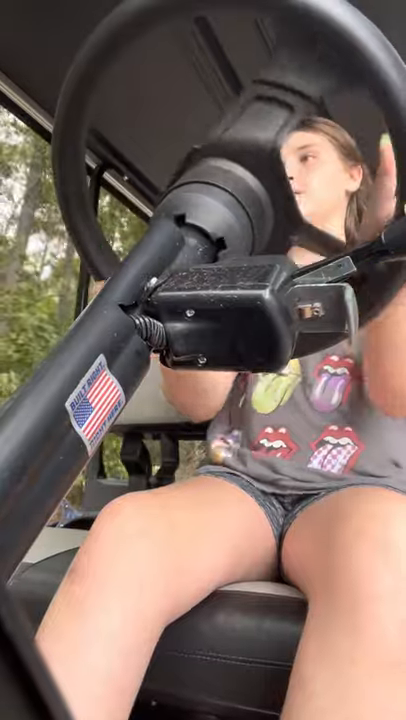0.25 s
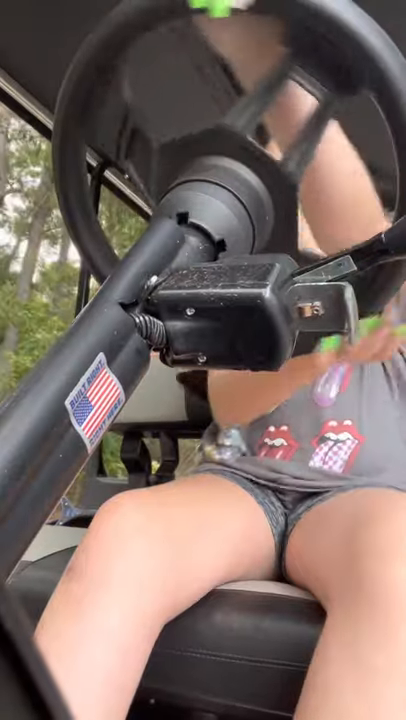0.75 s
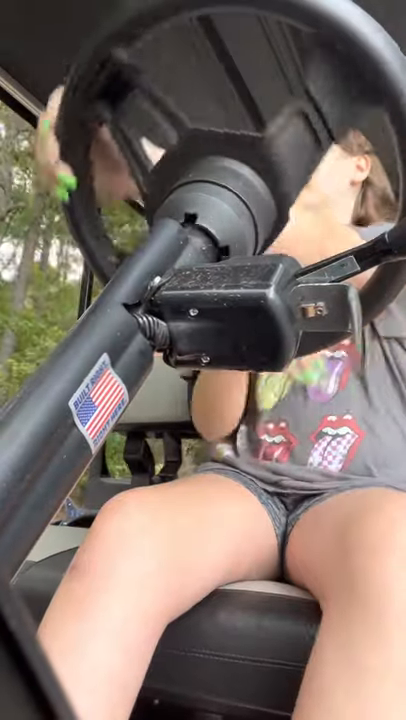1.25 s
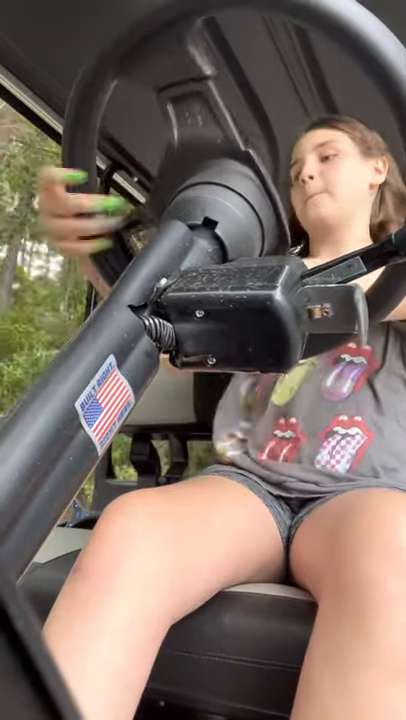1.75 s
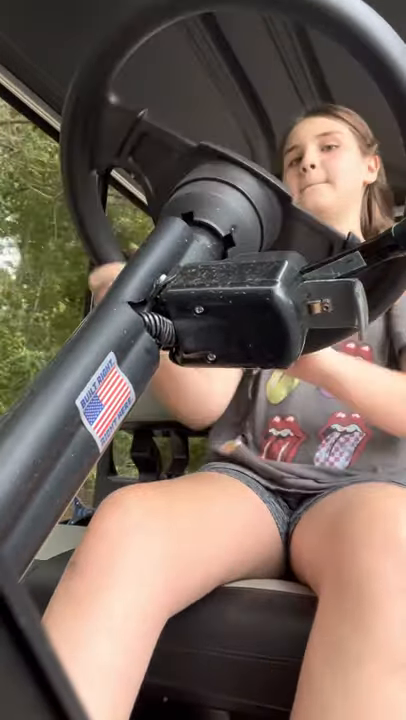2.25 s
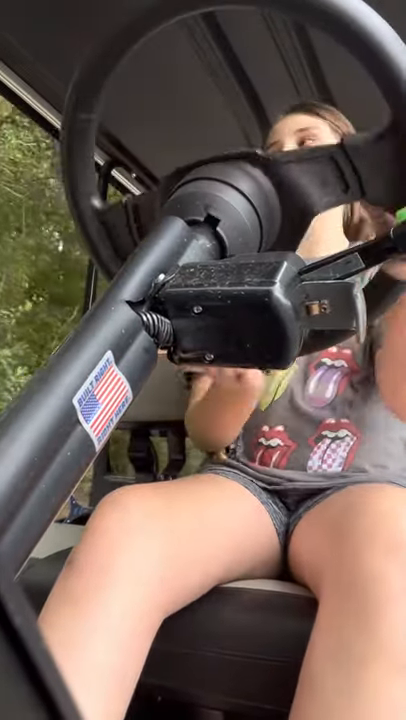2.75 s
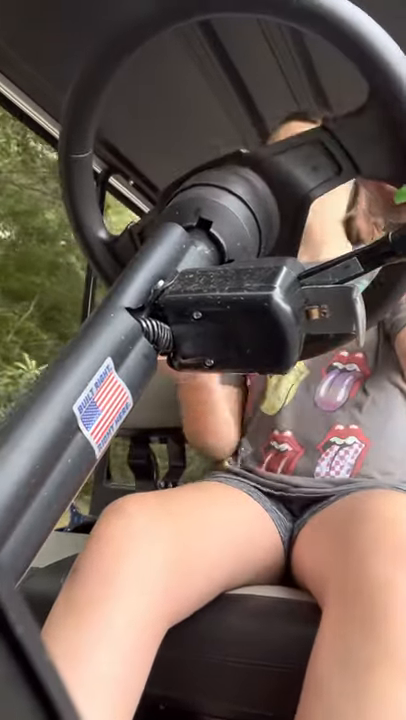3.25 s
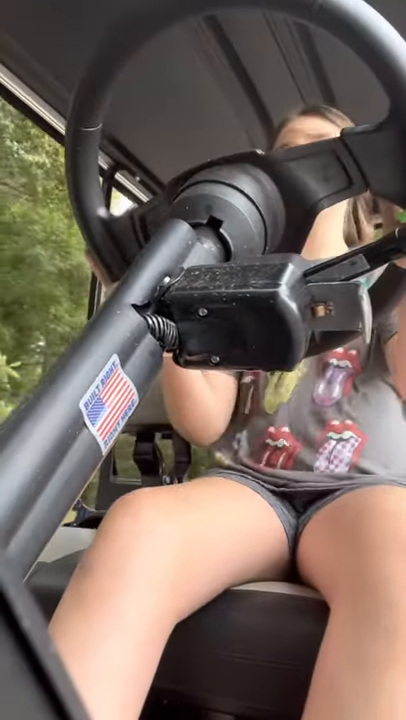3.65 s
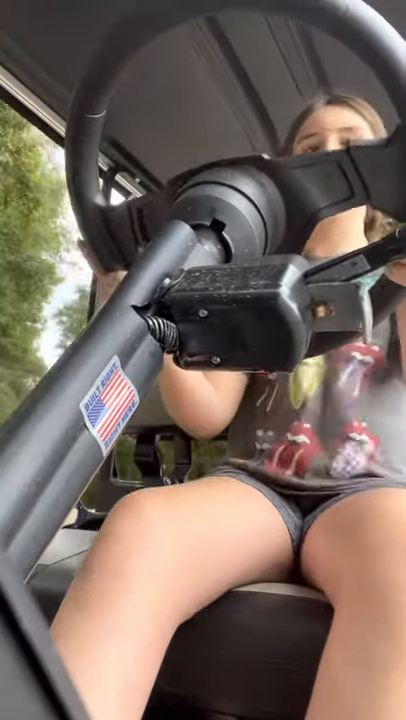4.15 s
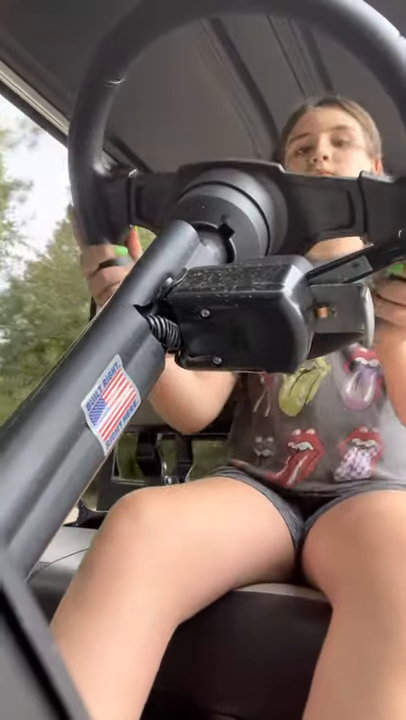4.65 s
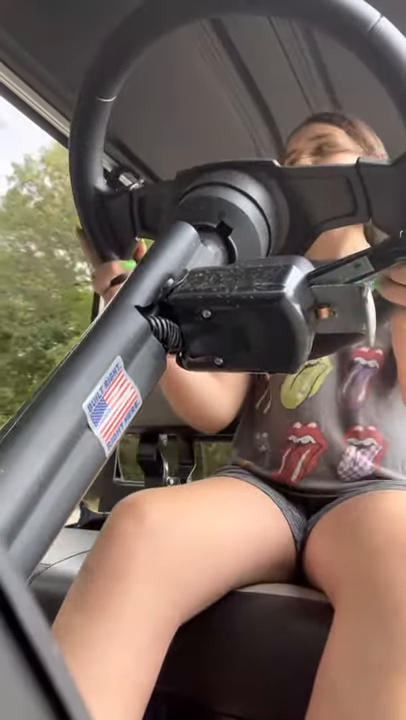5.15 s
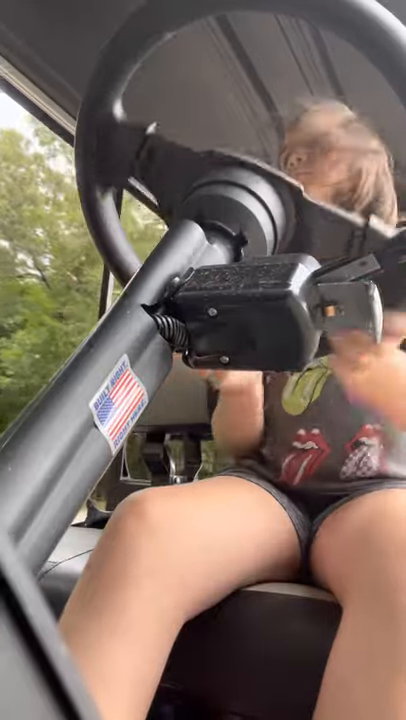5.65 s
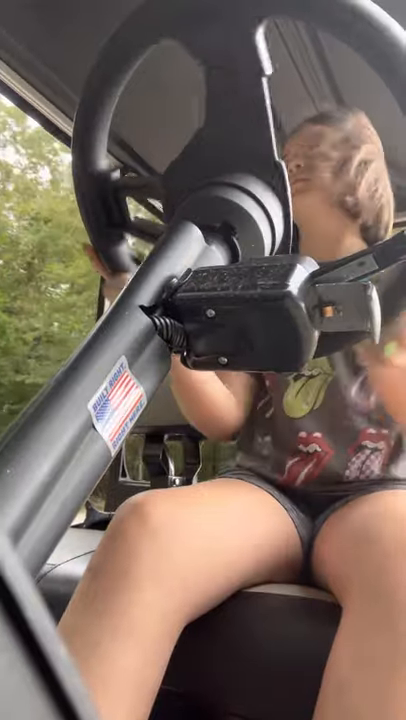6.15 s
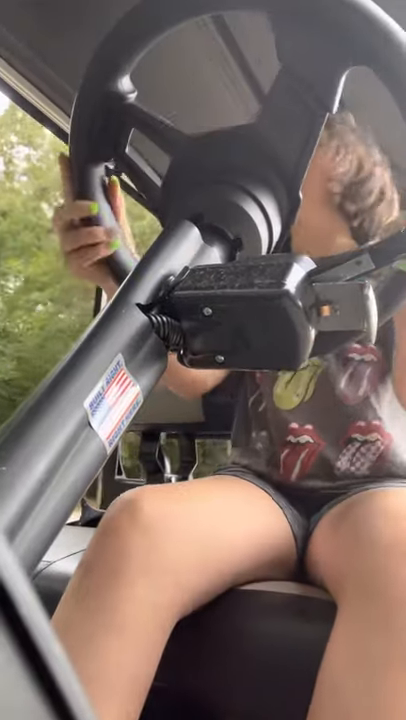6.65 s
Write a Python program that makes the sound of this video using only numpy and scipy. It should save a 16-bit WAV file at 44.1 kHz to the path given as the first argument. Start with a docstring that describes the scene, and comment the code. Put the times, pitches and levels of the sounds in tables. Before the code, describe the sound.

A small cart's one-cylinder engine drones with a deep steady boom over rolling rumble, while bumps knock the frame and loose parts click.

```python
"""First come a low engine boom and a deep tone that soon fades: a small cart with a one-cylinder engine drives by
steady firing, heard from near its floor through two microphone ports. The engine is a stack of sines locked to the
firing; road, drive and whir are coloured noise. Gusts and shakes are low noise, bumps are short knocks that ring
the frame. Brief bands of noise make the ticks of a flasher relay, the clicks of loose parts and soft low bursts
of rumble on rough ground.
"""
import sys
import numpy as np
from scipy import signal
from scipy.fft import rfft, irfft, next_fast_len
from scipy.io import wavfile
from scipy.ndimage import uniform_filter1d, map_coordinates

SR = 44100
rng = np.random.default_rng(int(sys.argv[2]) if len(sys.argv) > 2 else 0)


def wav_record(signal):
    """Record a signal, one row per channel, as 16-bit PCM in the file named by sys.argv[1]."""
    frames = np.transpose(np.atleast_2d(signal))
    bounded = np.clip(frames, -1, 1)
    # unit amplitude maps onto the largest positive 16-bit level
    quanta = np.round(bounded * 32767).astype(np.int16)
    wavfile.write(sys.argv[1], SR, quanta)


N = 304731

# Rough ground: t/s, dip of the boom/dB, rms level of the shake/dB
JOLTS = [(2.31, 7, -42), (2.81, 8.5, -33), (2.955, 12.5, -22.5), (3.04, 24.5, -36), (3.16, 2.5, -42),
         (3.49, 9.5, -36.5), (4.14, 5.5, -36.5), (5.667, 5, -35), (5.78, 6.5, -35.5), (5.94, 7.5, -27),
         (6.14, 5.5, -29.5), (6.21, 12.5, -29.5), (6.37, 9, -37.5)]
DIP_HALF_S, REBOUND = 0.0257, 0.174  # half-width of a dip; share that swells back on either side

# Wind. Colour of the shake and of the gusts: f/Hz, relative level/dB
SHAKE_COLOUR = [(20, -39.5), (40, 14), (60, 11), (100, -18), (160, 7.5), (300, -38.5), (500, -49)]
GUST_COLOUR = [(15, -48.5), (25, -24.5), (81, -7), (124, 0), (259, -4.5), (401, -7.5), (557, -7.5),
               (900, -24.5), (1170, -53), (1980, -120)]
# Gusts, opposite in the two ports: t/s, peak rms level/dB
GUSTS = [(.27, -30.5), (.5, -40.5), (.9, -41), (2.2, -42.5), (2.5, -40.5), (2.7, -32), (2.9, -30),
         (3.17, -17.5), (3.38, -31), (3.52, -19), (4.15, -33), (4.4, -41), (5, -55), (5.65, -37.5),
         (5.9, -39), (6.1, -36.5), (6.32, -30)]
GUST_FADE_DB_PER_S, CALM_GUST_DB = 156.5, -49  # rise and fall of a gust; level between gusts
SHAKE_HALF_S, SHAKE_LAG_S, CALM_SHAKE_DB = 0.083, 0.105, -44  # half-width; delay after the dip; floor

# Noise that differs between the ports: f/Hz, relative level/dB
PORT_COLOUR = [(59, -38.5), (100, -27), (223, -12.5), (252, 2), (362, -6), (509, -9.5), (610, 4), (688, -5),
               (808, -13), (1140, -6), (1460, -9.5), (1950, -16), (2500, -4.5), (2780, -5), (3050, -11),
               (3800, -11), (4300, -16.5), (5100, -18), (6000, -24.5), (6900, -39.5), (8000, -28),
               (12200, -27.5), (14500, -30), (15800, -36.5), (22000, -120)]
# Share of the common sound that differs: f/Hz, louder left (ratio), later left (ratio)
LEAN = [(100, 0.0051, 0), (300, -0.069, 0.029), (690, -0.03, 0.12), (950, .07, .15), (1200, 0.46, 0.44),
        (1460, .14, .06), (2000, 0, .3), (2450, .1, .4), (2900, -.13, -.1), (3450, .2, -.12),
        (3800, .11, .5), (4300, .05, .03), (5700, .15, .1), (6900, 0, .09), (8600, .02, .38),
        (12000, -.05, 0.9)]
SHARED_TOP_HZ, TOP_HZ = 12400, 15800  # upper limit of the common sound; limit of everything

# Low tone fading from the start: starting peak level/dB, f/Hz, time to fall 60 dB/s
DRONE = (-20, 156.4, 1.85)
HUM_TURNS = 13.89  # cycles of the thin hum per firing

# Relay: first tick t/s, period/s, level before fading/dB, centre f/Hz, width/octaves, time to fall 60 dB/s
FLASHER = (.514, .674, -44, 9800, .7, .035)
# Clicks of loose parts and soft low bursts of rumble on rough ground:
# t/s, level before fading/dB, centre f/Hz, width/octaves
CLICKS_AND_RUMBLES = [(.429, -42, 2600, .3), (.855, -27, 800, .8), (1.489, -41, 1700, 0.92),
                      (2.141, -30, 890, 0.54), (1.788, -35, 5300, .8), (2.93, -27, 300, 1.1),
                      (2.975, -26, 420, .7), (3.0, -26, 300, 1), (3.05, -25, 300, 1.2), (3.1, -25, 250, 1),
                      (3.222, -30, 5200, 1.2), (3.223, -29, 2000, .8), (3.223, -30, 2800, .2),
                      (3.223, -29, 1100, .7), (3.402, -38, 4800, 1.2), (3.402, -32, 1500, 1.2),
                      (4.107, -35, 1700, .6), (4.281, -20, 880, .3), (4.297, -22, 850, 0.27),
                      (5.131, -40, 2000, 0.4), (5.144, -39, 1950, .3), (5.207, -31, 1850, .15),
                      (5.208, -28, 1050, .5), (5.218, -34, 1850, .15), (5.476, -36, 1900, .4),
                      (5.833, -42, 2500, 2.4), (5.66, -27, 300, 1.1), (5.91, -27, 300, 1),
                      (5.957, -36, 1900, .4), (6.02, -28, 300, 1), (6.07, -29, 700, .7),
                      (6.125, -36, 1900, .4), (6.215, -32.5, 1780, 0.57), (6.3, -29, 550, 0.46),
                      (6.468, -29, 1000, .9), (6.468, -40, 5000, .7), (6.469, -31, 2600, .1),
                      (6.469, -29, 1870, .15), (6.484, -29, 900, 0.6), (6.68, -27, 990, 0.36),
                      (6.747, -32, 2620, 0.14), (6.747, -37, 1700, .6), (6.762, -36, 2000, .2)]
# Small random ticks: rate/(1/s), lowest level/dB, mean random extra/dB, centre f/Hz,
# width/octaves (its sign does not matter), time to fall 60 dB/s
RATTLE = (30, -48.5, 1.5, 2200, -0.2, 0.0433)
BURST_T60_S, DULLER_RINGS = .05, .25  # 60 dB decay at 1 kHz; power by which it grows toward low pitch
CABIN_RING_GROWS, CABIN_RING_WIDENS = .6, 2.2  # for these bursts: factors on the cabin's dB and widths

# Bumps: t/s, peak level of the knock/dB, f/Hz
THUMPS = [(.9, -17, 228), (2.238, -15, 360), (2.24, -19, 570), (2.245, -12, 85), (2.326, -15, 240),
          (2.34, -19, 240), (2.836, -13, 83), (2.951, -15, 590), (2.953, -14, 198), (2.96, -20, 345),
          (2.972, -17, 190), (3.016, -16, 200), (3.019, -22, 570), (3.083, -12, 115), (3.37, -22, 570),
          (3.468, -8.5, 245), (3.485, -15, 215), (3.53, -14, 88), (3.72, -22, 520), (4.928, -20, 546),
          (4.939, -13.5, 580), (4.954, -20, 550), (5.059, -21, 560), (5.09, -21, 570), (5.108, -23, 600),
          (5.519, -18, 190), (5.575, -23, 570), (5.607, -24, 540), (5.632, -15, 105), (5.646, -15, 130),
          (5.69, -23, 590), (5.888, -13, 141), (5.904, -20, 230), (6.003, -11, 110), (6.053, -19, 570),
          (6.102, -24, 600), (6.13, -22, 590), (6.131, -19, 110), (6.225, -23, 570), (6.238, -22, 390),
          (6.245, -16, 100), (6.33, -23, 520), (6.347, -23, 540)]
# Rough edge of a bump: level against the knock/dB, centre over its pitch (ratio),
# width/octaves, time to fall 60 dB/s
BUMP_EDGE = (-15, 1.4, 1.1, 0.02)
# Ringing modes of the frame: f/Hz, relative level/dB, time to fall 60 dB/s
FRAME = [(85, -2, 0.097), (108, -14, 0.031), (141.4, -3.5, 0.158), (185, 1, 0.057), (246, 0.5, 0.048),
         (348.4, 10, 0.039), (463, -6.5, 0.045), (550.4, 5.5, 0.063), (631.7, -9, 0.028)]
REACH_OCT, FRAME_RING_DB = 0.565, -8  # how far a bump stirs modes; their common level against the knock
KNOCK_S, DEEPER_LASTS = .0048, .33  # rise to the peak at 250 Hz; power by which it grows toward low pitch

# Rolling noise: t/s, rms level of the road/dB, rms level of the drive/dB
RUSH = [(0.0, -28.5, -28.5), (0.25, -25, -34), (1.17, -26, -32), (2.3, -27, -34), (3.33, -24.5, -31),
        (3.66, -31, -32), (4.2, -30, -30), (4.44, -33.5, -29), (4.7, -26.5, -30.5), (5.14, -29.5, -28.5),
        (5.62, -28, -30.5), (6.58, -33.5, -30.5), (6.91, -39, -31)]
# Colours of road, drive and whir: f/Hz, relative level/dB
ROAD_COLOUR = [(20, -49), (35, -15), (50, -24.5), (70, -3), (90, -7), (120, -10), (190, -10.5), (255, -8),
               (275, -15), (400, -16.5), (440, -23), (580, -13.5), (990, -120)]
DRIVE_COLOUR = [(240, -11.5), (400, -10), (430, -7.5), (486, 2.5), (557, -1), (746, -4), (838, -6),
                (1250, -18), (1400, -47.5), (1820, -18.5), (3080, -120)]
WHIR_COLOUR = [(700, -8.5), (1200, -6.5), (1350, -3.0), (1550, 1.0), (1780, -4.5), (2000, -2.5),
               (2450, -4.5), (3150, -10), (3550, -12.0), (4200, -10), (4900, -10), (5300, -12.5),
               (8000, -15), (11000, -23.0), (11800, -25.5), (12400, -42), (16000, -89.5)]
# Cabin resonances: f/Hz, width/Hz, gain/dB
CABIN = [(1250, 50, -3.5), (1878, 60, 6), (2620, 40, 2), (2840, 200, 7.5), (3170, 110, -4),
         (3560, 110, -2.5), (3850, 160, 7), (4560, 250, 1.5), (5260, 170, -2.5)]
# How strongly the second cabin resonance sings: t/s, level/dB against 11 dB under the whir
PANEL = [(0, -0.5), (1, -2.5), (2.4, -9.5), (3.2, 4.5), (4.5, -1.5), (5.5, 6), (6.91, -4)]
WHIR_DB, WHIR_EARLY_DB, WHIR_SETTLES_S = -42.5, 2, 0.385  # steady level; extra at the start, dying away

# Engine speed: t/s, firings per second/Hz
ENGINE = [(0, 22.4), (.3, 21.9), (.6, 21.15), (1.0, 20.95), (6.91, 20.93)]
# Boom of the body: t/s, rms level before the dips/dB, gain of its upper overtones/dB
BOOM = [(0, -20, 3.5), (.42, -17.5, 0), (.9, -18, 3), (1.2, -19, 3), (1.9, -18.5, 4.5), (2.17, -19.5, 6),
        (2.6, -21.5, 4.5), (3.4, -21.5, 2), (3.8, -19.5, 2.5), (4.6, -19, 4.5), (5.1, -19.5, 2.5),
        (5.6, -19.5, 1), (6.1, -20, -4), (6.91, -21.5, -1.5)]
# Strong overtones and the thin hum: t/s, rms level of 6th/dB, 9th/dB, 12th/dB, hum/dB
OVERTONES = [(0.0, -33.5, -32, -37.5, -36), (0.41, -35.5, -33.5, -38, -35.5), (0.81, -35.5, -27, -41, -33),
             (1.22, -30, -38, -39, -37), (1.62, -38, -30.5, -37.5, -32.5), (2.03, -34.5, -29, -29.5, -41.5),
             (2.44, -31, -32.5, -32.0, -37), (2.84, -36.5, -27.5, -35.5, -40.5), (3.25, -35, -33, -30, -37),
             (3.65, -41.5, -28, -34.5, -38), (4.06, -37.5, -30, -31, -43), (4.46, -40, -33, -34, -40),
             (4.87, -37.5, -30.5, -33, -51.5), (5.28, -49, -32.0, -36.5, -50),
             (5.68, -39.5, -31, -32, -48.0), (6.09, -30, -33.0, -39.0, -50.5),
             (6.49, -36.5, -29, -37.5, -36.5), (6.9, -38.0, -37, -45, -49)]
# Other overtones: multiple of the firing rate, rms level/dB (multiples of 3 also follow the boom's gain)
ORDER = [(4, -41), (5, -49.5), (7, -40.5), (8, -41), (10, -41), (11, -39.5), (13, -51), (14, -50),
         (15, -44.5), (16, -49.5), (17, -47), (18, -53.5), (19, -58.5), (22, -44.5), (23, -42.5), (24, -47),
         (25, -45.5), (26, -45.5), (27, -54.5), (28, -42.5), (29, -51.5), (30, -49), (31, -50.5), (32, -44),
         (39, -50), (41, -50), (47, -53.5)]


def amp(db):
    """Gain of a level in dB."""
    return 10 ** (np.asarray(db) / 20)


def unit(x):
    """x scaled to rms 1."""
    return x / np.sqrt(np.mean(x ** 2) + 1e-20)


def along(points, hz):
    """Read a table of frequencies and values, joined by lines on a log frequency axis."""
    f, v = np.transpose(points)
    return np.interp(np.log(hz + 1), np.log(f + 1), v)


def curves(rows):
    """One value per sample for each column after the time."""
    s, *columns = np.transpose(rows)
    return [np.interp(np.arange(N) / SR, s, column) for column in columns]


def bell(s, half_s):
    """A bell-shaped swell around s."""
    return np.exp(-((np.arange(N) / SR - s) / half_s) ** 2)


def wobble(rate):
    """A smooth random curve with rate knots a second."""
    return map_coordinates(rng.standard_normal(400), [np.arange(N) * rate / SR], mode="mirror")


def filtered(x, response):
    """x passed through a response given as a function of frequency."""
    m = next_fast_len(N + SR // 2)
    return irfft(rfft(x, m) * response(np.fft.rfftfreq(m, 1 / SR)), m)[..., :N]


def rush(db_at, patchy_db):
    """Coloured noise of rms 1 whose gain varies in random patches of time and frequency."""
    spectrum = signal.stft(rng.standard_normal(N), nperseg=512)[2]
    smooth_in_pitch = uniform_filter1d(rng.standard_normal(spectrum.shape), size=6, axis=0)
    patches = unit(uniform_filter1d(smooth_in_pitch, size=10, axis=1))
    noise = signal.istft(spectrum * amp(patchy_db * patches), nperseg=512)[1][:N]
    return unit(filtered(noise, lambda hz: amp(db_at(hz))))


def add_burst(track, s, db, hz, octaves, t60):
    """Add a burst at s: a band of noise that starts almost at once and dies away."""
    t, f = np.arange(4096) / SR, np.fft.rfftfreq(4096, 1 / SR)
    weight = np.exp(-(np.log2((f + 1) / hz) / octaves) ** 2)
    band = unit(irfft(rfft(rng.standard_normal(4096)) * weight))
    fade = amp(-60 * t / t60)
    # Every random draw gets the same energy under the fade
    band = band * np.linalg.norm(fade) / np.linalg.norm(fade * band)
    onset = 1 - np.exp(-t / .0012)
    track[round(s * SR):][:4096] += amp(db) * fade * band * onset


def crank():
    """Firing phase in radians: the running sum of the engine speed, with a little flutter."""
    rate, = curves(ENGINE)
    return 2 * np.pi * np.cumsum(rate * (1 + 0.002025 * wobble(6))) / SR


def port_noise():
    """Unsteady coloured noise that is opposite in the two ports."""
    return amp(-41.5 + 0.8 * wobble(9)) * rush(lambda hz: along(PORT_COLOUR, hz), patchy_db=1.1)


def wind():
    """Low noise: a deep shake after each jolt, common to both ports, and lumpy gusts opposite in them."""
    t = np.arange(N) / SR
    shake = amp(CALM_SHAKE_DB) + sum(amp(db) * bell(s + SHAKE_LAG_S, SHAKE_HALF_S) for s, _, db in JOLTS)
    gust = amp(CALM_GUST_DB) + sum(amp(db - GUST_FADE_DB_PER_S * abs(t - s)) for s, db in GUSTS)
    shake_noise = amp(1.5 * wobble(14)) * rush(lambda hz: along(SHAKE_COLOUR, hz), patchy_db=1.5)
    gust_noise = amp(3 * wobble(18)) * rush(lambda hz: along(GUST_COLOUR, hz), patchy_db=2.5)
    return shake * unit(shake_noise), gust * unit(gust_noise)


def hum(phase):
    """A thin sine geared to the engine, and a lower sine that fades from the start."""
    hum_db, t = curves(OVERTONES)[-1], np.arange(N) / SR
    low_db, low_hz, t60 = DRONE
    drone = amp(low_db - 60 * t / t60) * np.sin(2 * np.pi * low_hz * t)
    thin = np.sqrt(2) * amp(hum_db + 0.98 * wobble(4.8)) * np.sin(HUM_TURNS * phase)
    return drone + thin


def cabin_ring(f):
    """Response of the first six cabin resonances, each a peak or a notch with its own phase shift."""
    response = 1
    for centre, width, db in CABIN[:6]:
        w, g = width * CABIN_RING_WIDENS, amp(db * CABIN_RING_GROWS / 2)
        off_centre = centre * centre - f * f
        response = response * (off_centre + 1j * f * w * g) / (off_centre + 1j * f * w / g)
    return response


def clicks_and_rumbles():
    """Relay ticks, clicks of loose parts, soft low rumbles and a faint rattle: noise bursts in the cabin."""
    out = np.zeros(N + SR)
    first, period, *tick = FLASHER
    for k in range(10):
        add_burst(out, first + k * period, *tick)
    for s, db, hz, octaves in CLICKS_AND_RUMBLES:
        # Duller ones ring longer
        add_burst(out, s, db, hz, octaves, BURST_T60_S * (hz / 1000) ** -DULLER_RINGS)
    rate, db, scatter_db, hz, octaves, t60 = RATTLE
    gaps, sizes = rng.exponential(size=(400, 2)).T
    for s, size in zip(np.cumsum(gaps) / rate, sizes):
        if s < N / SR:
            add_burst(out, s, db + scatter_db * size, hz, octaves, t60)
    return filtered(out[:N], cabin_ring)


def thumps():
    """Each bump is a short knock with a rough edge, and rings the frame modes near its pitch."""
    out, t = np.zeros(N + SR), np.arange(SR // 2) / SR
    modes_hz, level_db, t60 = np.transpose(FRAME)[..., None]
    rings = amp(level_db - 60 * t / t60) * np.sin(2 * np.pi * modes_hz * t) * (1 - np.exp(-t / .004))
    edge_db, above, octaves, edge_t60 = BUMP_EDGE
    for s, db, hz in THUMPS:
        near = np.exp(-(np.log2(modes_hz / hz) / REACH_OCT) ** 2)
        u = t / (KNOCK_S * (hz / 250) ** -DEEPER_LASTS)  # time in units of the rise
        knock = (u * np.exp(1 - u)) ** 2 * np.sin(2 * np.pi * hz * t)
        frame = amp(FRAME_RING_DB) * (near * rings).sum(axis=0)
        out[round(s * SR):][:len(t)] += amp(db) * (knock + frame)
        add_burst(out, s, db + edge_db, hz * above, octaves, edge_t60)
    return out[:N]


def rolling(phase):
    """Road rumble, drive noise throbbing with the firing, and a whir coloured by the cabin's resonances."""
    road_db, drive_db = curves(RUSH)
    whir_db = WHIR_DB + WHIR_EARLY_DB * bell(0, WHIR_SETTLES_S)
    waver = wobble(8.2)  # shared by road, drive and whir
    throb = 1 + 0.021 * np.sin(phase) + 0.071 * np.sin(3 * phase)

    def whir_colour(hz):
        """Whir colour in dB with the cabin's peaks and notches added."""
        return along(WHIR_COLOUR, hz) + sum(db * np.exp(-((hz - c) / w) ** 2) for c, w, db in CABIN)

    road = amp(road_db + .5 * waver) * rush(lambda hz: along(ROAD_COLOUR, hz), patchy_db=1.5)
    drive = amp(drive_db + .5 * waver) * throb * rush(lambda hz: along(DRIVE_COLOUR, hz), patchy_db=1.2)
    whir_gain = amp(whir_db + 0.142 * waver + 0.164 * wobble(25)) * (1 + 0.032 * np.sin(phase))
    whir = whir_gain * rush(whir_colour, patchy_db=1.46)
    c, w, _ = CABIN[1]
    panel_noise = rush(lambda hz: np.maximum(-9 * ((hz - c) / w) ** 2, -120), patchy_db=2)
    panel = amp(whir_db + curves(PANEL)[0] - 11) * panel_noise
    return road + drive + whir + panel


def engine(phase):
    """Sines at multiples of the firing rate; the third booms in the body and dips at each jolt."""
    boom_db, over_db = curves(BOOM)
    for s, dip, _ in JOLTS:
        boom_db = boom_db + dip * (REBOUND * bell(s, 3 * DIP_HALF_S) - (1 + REBOUND) * bell(s, DIP_HALF_S))
    out = amp(boom_db) * np.sin(3 * phase)
    # The strong overtones crest with the boom, give or take a small random phase
    for k, db, waver_db in zip((6, 9, 12), curves(OVERTONES), (1.5, 3, 1.3)):
        level = amp(db + waver_db * wobble(12))
        out += level * np.cos(k * (phase - np.pi / 6) + .3 * waver_db * wobble(12))
    for k, db in ORDER:
        level = amp(db + (k % 3 == 0) * over_db + 3.2 * wobble(14))
        out += level * np.sin(k * phase + 2 * np.pi * rng.random() + .5 * wobble(14))
    return np.sqrt(2) * out  # a sine of rms 1 peaks at the root of 2


def scene():
    """What both ports share, plus (left) and minus (right) what differs between them."""
    phase, bursts = crank(), clicks_and_rumbles()
    shake, gusts = wind()
    shared = shake + hum(phase) + bursts + thumps() + rolling(phase) + engine(phase)
    differing = gusts + port_noise()
    f, louder, later = np.transpose(LEAN)
    # The imaginary part is a quarter-cycle shift: it makes one port lag the other
    differing += filtered(shared, lambda hz: np.interp(hz, f, louder) - 1j * np.interp(hz, f, later))
    differing += amp(-14.0) * np.roll(bursts, 9)  # the bursts echo unevenly, 9 samples later
    return np.array([shared + differing, shared - differing])


def record(dry):
    """The shared sound fades out lower than what differs; nothing passes above the band limit."""
    shared = filtered(dry[0] + dry[1], lambda hz: 1 / (1 + (hz / SHARED_TOP_HZ) ** 40)) / 2
    differing = (dry[0] - dry[1]) / 2
    return filtered(np.array([shared + differing, shared - differing]), lambda hz: hz < TOP_HZ)


dry = scene()
out = record(dry)
wav_record(out)
```